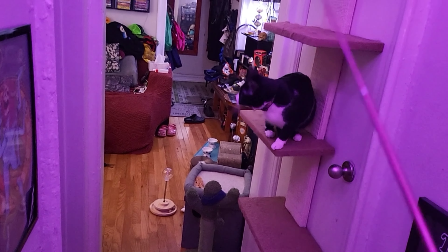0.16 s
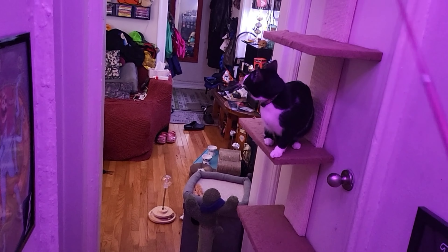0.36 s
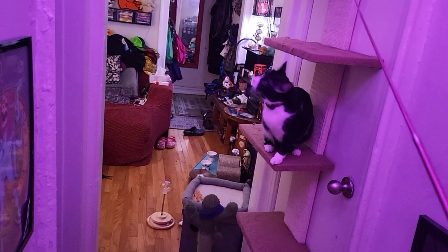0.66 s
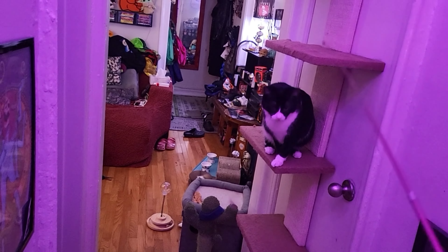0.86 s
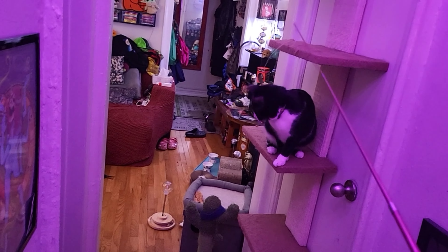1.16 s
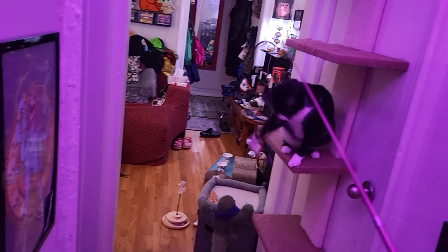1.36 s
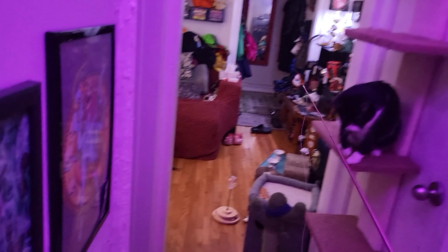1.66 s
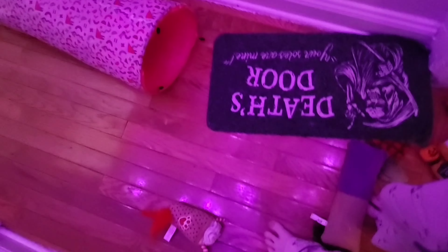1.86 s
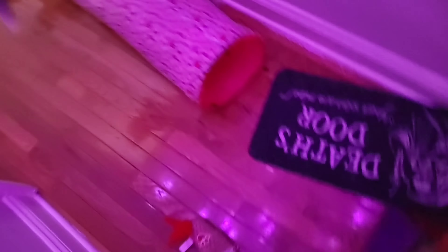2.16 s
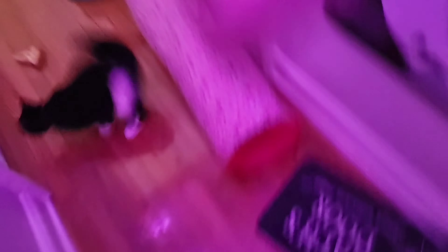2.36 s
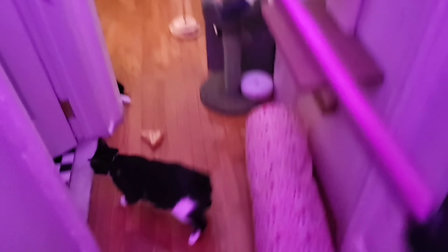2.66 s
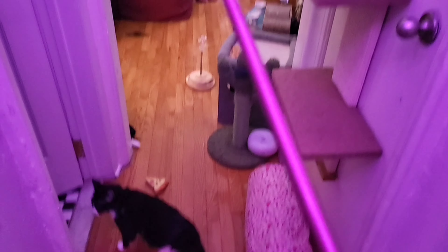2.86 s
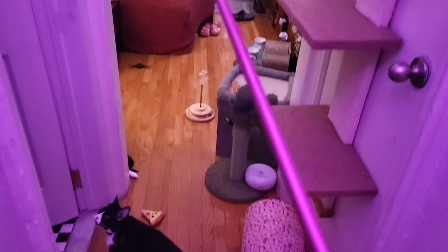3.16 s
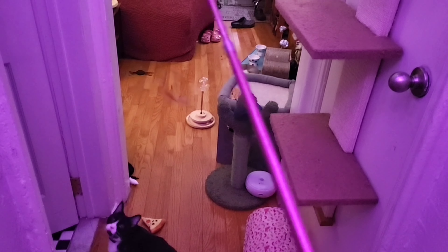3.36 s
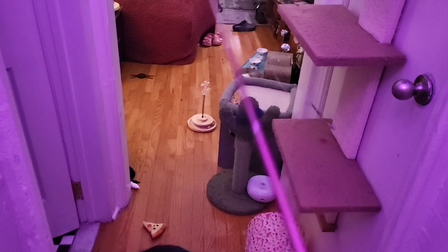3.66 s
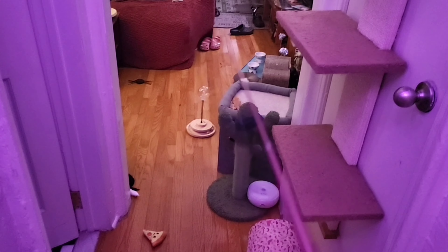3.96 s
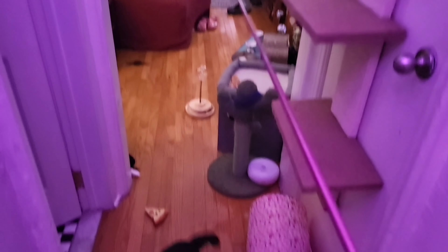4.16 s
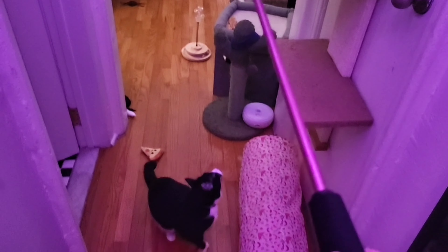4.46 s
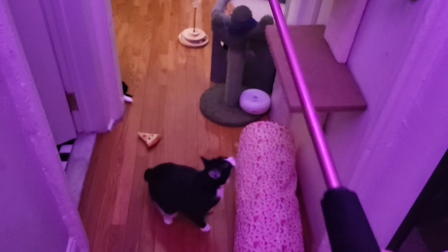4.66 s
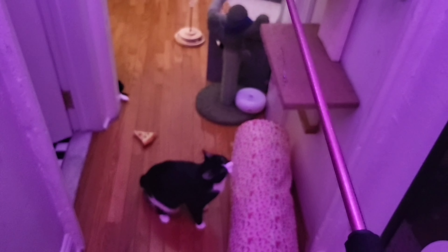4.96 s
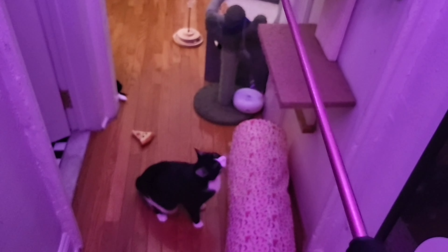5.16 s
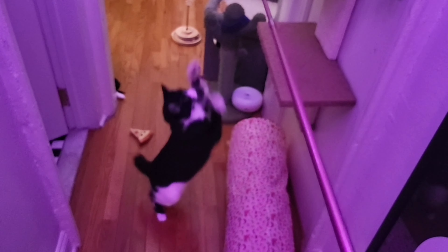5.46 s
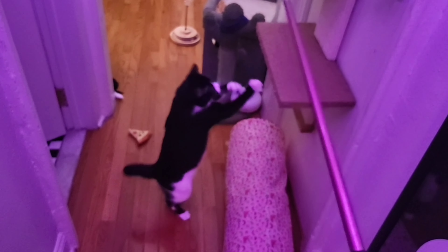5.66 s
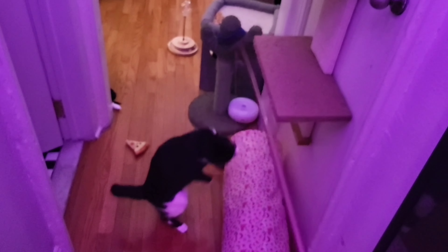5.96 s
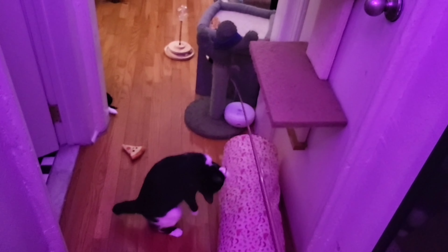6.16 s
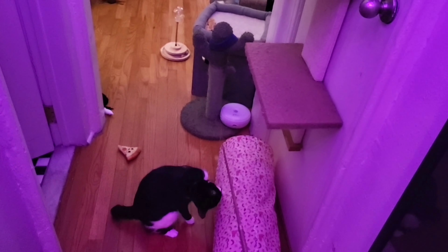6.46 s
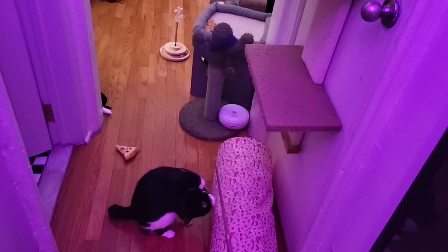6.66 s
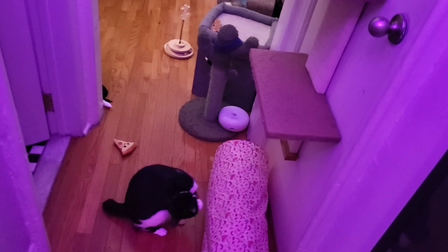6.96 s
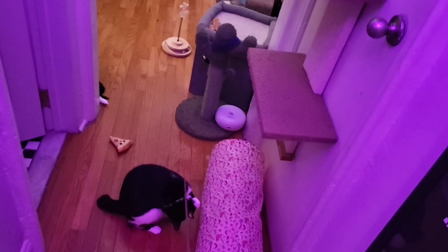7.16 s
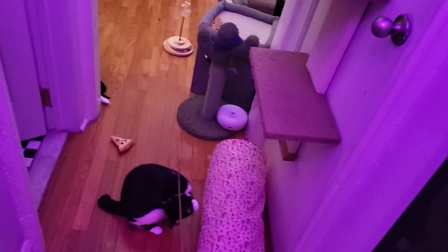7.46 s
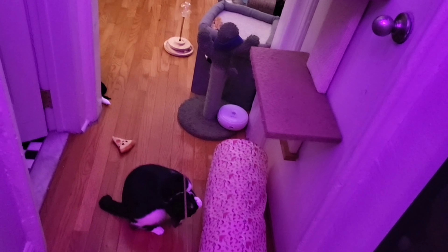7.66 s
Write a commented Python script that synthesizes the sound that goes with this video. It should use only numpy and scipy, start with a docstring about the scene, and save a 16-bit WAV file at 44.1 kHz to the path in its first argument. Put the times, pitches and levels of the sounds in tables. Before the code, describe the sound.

A handheld stereo microphone hears a cat toy up close indoors. Its small, very high-pitched bell rattles and tinkles on and off while the rod ticks. Two quick smacks against wood come first, then a low double thump and knocks as a cat lands on floorboards. After sparser jingling and one lively burst, it grows quiet with faint cloth slides, and a finger taps the right microphone port. Faint air and low hum persist.

```python
"""A tiny bell on the string of a wand toy jingles in bursts as cats play in a hallway with a wooden floor.
Inside it a loose pellet strikes, rebounds and rolls, ringing the shell through fading sine waves.
The toy smacks the woodwork twice, the rod ticks, wood knocks and a cat jumps down with a dull thump:
these mix coloured noise with ringing tones. Scuffs and string are grainy noise that follows movement.
Near the end a finger taps one microphone port; faint air noise and a low hum lie under it all."""
import sys
import numpy as np
from scipy import signal
from scipy.fft import rfft, irfft, next_fast_len
from scipy.io import wavfile
from scipy.ndimage import uniform_filter1d

SR = 44100
rng = np.random.default_rng(int(sys.argv[2]) if len(sys.argv) > 2 else 0)


def write(x):
    x = np.atleast_2d(x).T
    wavfile.write(sys.argv[1], SR, np.round(np.clip(x, -1, 1) * 32767).astype(np.int16))


N = 344421
TIME = np.arange(N) / SR
AGE = TIME[:SR]   # the first second after a blow

# tone colour of something sliding over cloth, also used for the faint hiss after the tap:
# (frequency [Hz], level [dB])
SLIDE_COLOUR = [(500, -10), (1800, -6.5), (3000, -7), (5000, -3), (6500, -2.5), (9000, -7.5), (15000, -13)]
PANEL_RIPPLE_DB = 6   # unevenness that close resonances give to struck wood


def from_db(db):
    """Turn decibels into a gain."""
    return 10 ** (np.asarray(db) / 20)


def rms_one(x):
    """Scale a signal to an average (rms) strength of 1."""
    return x / np.sqrt(np.mean(x ** 2) + 1e-20)


def at_hz(points, hz):
    """Read a table between its points on a log-frequency axis."""
    f, value = np.transpose(points)
    return np.interp(np.log(hz), np.log(f), value)


def dying(t60):
    """Envelope that loses 60 dB in t60 seconds."""
    return np.exp(-np.log(1000) * AGE / t60)


def swelling(rise_s):
    """Envelope that builds up from nothing to 1."""
    return 1 - np.exp(-AGE / max(rise_s, 1e-5))


def panned(db):
    """Left and right gains; a positive level difference favours the left."""
    return from_db([[db / 2], [-db / 2]])


def add(out, s, sound):
    """Mix a sound in at time s."""
    i = max(round(s * SR), 0)
    out[..., i:i + sound.shape[-1]] += sound[..., :N - i]


def mode(hz, t60, phase=0):
    """One way a struck object vibrates: a sine wave whose envelope starts at 1 and dies away."""
    return np.sin(2 * np.pi * hz * AGE + phase) * dying(t60)


def noise(colour, tilt_db=0, size=SR, ripple_db=0):
    """Stereo noise of a given colour, rippled by close resonances; its left-right likeness varies with pitch."""
    # how alike the two ports hear a sound: (frequency [Hz], left-right correlation [-1 to 1])
    likeness = [(30, 0.94), (130, 0.14), (260, 0.92), (500, -0.45), (1100, -0.22), (2200, -0.23),
                (15000, 0.11)]
    hz = np.arange(size // 2 + 1) * SR / size + 1e-3
    mid, side = rfft(rng.standard_normal((2, size)))
    alike = np.clip(at_hz(likeness, hz), -1, 1)
    ripple = np.interp(np.sqrt(hz / hz[-1]), np.linspace(0, 1, 300), rng.uniform(-1, 1, 300))
    tilt = tilt_db * np.log2(np.maximum(hz, colour[0][0]))
    gain = from_db(at_hz(colour, hz) + tilt + ripple_db * ripple) * (hz > 20)
    # the shared part has the same sign on both sides, the other part opposite signs
    both = np.sqrt(1 + alike) * mid + np.sqrt(1 - alike) * side * [[1], [-1]]
    return rms_one(irfft(gain * both, size))


def hallway(t60, wet_db):
    """Direct sound, then a dense wash of reflections with wet_db of energy."""
    wash = rng.standard_normal((2, SR)) * dying(t60) * swelling(0.0054)
    response = from_db(wet_db) * wash / np.sqrt(np.sum(wash ** 2) / 2)
    response[0, 1] += 1   # the direct sound reaches the right port one sample earlier
    response[1, 0] += 1
    return response


def wavering(depth_db, rate_hz):
    """Level flutter as reflections mix, different at each port; it holds still after 200 steps."""
    knots = rng.normal(0, depth_db, (2, 200))
    return from_db([np.interp(AGE * rate_hz, np.arange(len(k)), k) for k in knots])


def stroke(s, db, rise_s, fall_s):
    """Gain of one rubbing movement that swells up to time s and fades."""
    depth_db = 30   # level change over one rise or fall time
    away = np.maximum((s - TIME) / rise_s, (TIME - s) / fall_s)
    return from_db(db - depth_db * np.minimum(away, 10))


def lingering(blows, envelope):
    """Gain that follows each blow, its power shaped by the envelope."""
    return np.sqrt(np.abs(signal.oaconvolve(blows ** 2, envelope)[:N]))


def swinging(fade_db_per_s=19, rise_s=0.0082, stop_t60=.17, dangle_db=-80.5):
    """How lively the bell is: each swing starts quickly, fades slowly and settles."""
    # the bell swings on its string and the pellet keeps tumbling:
    # (time [s], length [s], relative level [dB])
    swings = [(0.412, 0.19, -42), (0.88, 0.23, -65), (1.313, 0.51, -65), (1.719, 0.19, -65),
              (1.957, 0.092, -49), (2.196, 0.17, -55.5), (2.388, 0.19, -47), (3.17, 0.26, -55),
              (3.61, 0.33, -71), (3.877, 0.15, -57.5), (4.443, 0.36, -64.5), (4.743, 0.35, -53.5),
              (5.168, .3, -66), (5.51, 0.15, -41), (5.732, 0.16, -60.5), (6.675, 0.1, -62),
              (7.11, 0.14, -68), (7.53, .19, -62)]
    out = np.full(N, from_db(dangle_db))   # the string never hangs quite still
    for s, length_s, db in swings:
        settling_db = 60 * np.maximum(AGE - length_s, 0) / stop_t60
        add(out, s, from_db(db - fade_db_per_s * AGE - settling_db) * swelling(rise_s))
    return out


def pellet_blows(swing, jolt_db=4, rebound_db=-10, rebound_s=0.0065):
    """Hard jolts and the lighter, uneven tumbling of a swinging bell; each blow rebounds twice."""
    # hard jolts that throw the pellet against the shell: (time [s], relative level [dB])
    jolt_table = [(0.3461, -14.5), (0.6596, -20.5), (0.6854, -17), (0.6878, -14.5), (0.7363, -26.5),
                  (0.7567, -27.5), (0.938, -42.5), (1.449, -50), (1.8218, -47), (1.8926, -49),
                  (1.9694, -28.5), (2.0593, -28.5), (2.0943, -29), (2.4226, -33), (2.7457, -43.5),
                  (3.0742, -42.5), (3.1418, -38), (3.1953, -32), (3.2475, -36.5), (3.3054, -44),
                  (3.3363, -44), (4.5146, -48), (4.732, -27.5), (4.7504, -21), (4.8384, -33),
                  (4.935, -35.5), (5.014, -41), (5.1794, -42.5), (5.222, -45), (5.2855, -45.5),
                  (5.3368, -51), (5.525, -18), (5.5494, -17), (5.5753, -22.5), (5.6613, -21), (5.7528, -39),
                  (5.8114, -39.5), (5.8875, -49.5), (6.77, -48.5)]
    tumble_s, tumble_db, spread_db = .05, 13, 5.5   # average spacing, height above the swing, scatter
    skid_s, skid_db = 0.0052, -17   # the pellet grazes the shell just ahead of a hard jolt
    tumbles = np.cumsum(rng.uniform(.5, 1.5, size=240)) * tumble_s
    scatter_db = spread_db * rng.standard_normal(len(tumbles))
    light = np.interp(tumbles, TIME, swing, right=0) * from_db(tumble_db + scatter_db)
    jolts, db = np.transpose(jolt_table)
    hard = from_db(db + jolt_db)
    s = np.r_[tumbles, jolts - skid_s, jolts]
    strength = np.r_[light, hard * from_db(skid_db), hard]
    # every blow is followed by two rebounds, each weaker than the one before
    flights = rng.uniform(.3, 2, (len(s), 2)) * rebound_s
    when = s[:, None] + np.cumsum(np.c_[np.zeros(len(s)), flights], axis=1)
    at = np.clip(np.round(when * SR).astype(int), 0, N - 1)
    blows = np.zeros(N)
    blows[at] = strength[:, None] * from_db(rebound_db * np.arange(at.shape[1]))
    return blows


def bell(blows, swing, strike_db=-8, chatter_db=-8, scrape_db=-14, rolls_per_s=160, uneven_db=6.5,
         chatter_s=.005, low_hz=9300):
    """A loose pellet strikes the slit shell, chatters and rolls; every touch sets the shell's modes ringing."""
    # how the bell's shell rings: (frequency [Hz], level [dB], time to fade 60 dB [s])
    shell_modes = [(7000, -30, .002), (10350, -14, .006), (11250, -14, .008), (11690, -3, .02),
                   (11830, -2, .022), (11940, -1, .026), (12250, -16, .015), (12800, -20, .01),
                   (15300, -29, .004)]
    swing_roll_db, roll_db = -6.5, -3   # rolling relative to the swing, and to each blow
    roll_rise_s, roll_t60 = 0.0089, .1
    rings = [from_db(level) * mode(hz, t60) for hz, level, t60 in shell_modes]
    shell = from_db(strike_db) * signal.oaconvolve(blows, sum(rings) * swelling(.0014))[:N]
    # each blow brings a few milliseconds of chatter against the metal
    burst = dying(chatter_s) * swelling(.001)
    chatter = from_db(chatter_db) * lingering(blows, burst / burst.sum())
    # the pellet rolls while the bell swings and for a moment after each blow
    after_blow = lingering(blows, (dying(roll_t60) * swelling(roll_rise_s)) ** 2)
    roll = np.hypot(from_db(swing_roll_db) * swing, from_db(roll_db) * after_blow)
    touch_gain = from_db(uneven_db * np.clip(rng.standard_normal(N), -2, 2))
    touches = (rng.random(N) < rolls_per_s / SR) * touch_gain
    touches = rms_one(np.sqrt(np.abs(uniform_filter1d(touches ** 2, size=60))))
    rolling = touches * roll * from_db(-6) / np.sqrt(np.sum(np.square(rings)))
    # fresh noise for every mode, so each touch rings the modes differently
    for ring in rings:
        shell += signal.oaconvolve((chatter + rolling) * rng.standard_normal(N), ring)[:N]
    # the rolling pellet also scrapes, a broader hiss around the ring
    scrape_band = signal.butter(2, [9800, 13400], "band", fs=SR, output="sos")
    scrape = signal.sosfilt(scrape_band, rng.standard_normal(N))
    shell += from_db(scrape_db) * rms_one(scrape) * touches * roll
    # so small a shell radiates hardly any low sound
    bright = signal.sosfilt(signal.butter(8, low_hz, "high", fs=SR, output="sos"), shell)
    faint = signal.sosfilt(signal.butter(2, [3500, 7800], "band", fs=SR, output="sos"), shell)
    shell = bright + from_db(-4) * faint
    room = hallway(t60=.19, wet_db=-3)
    return signal.oaconvolve(shell[None], room, axes=1)[:, :N] * panned(-2.8)


def smacks(early_t60=0.14, late_t60=0.3, late_db=-18, crack_t60=.012):
    """Toy hits wood: a crack, a rattling wash off the near walls, a longer room tail and the toy's own ring."""
    # the toy smacks the woodwork: (time [s], wash level [dB], build-up [s], first crack [dB],
    # treble tilt [dB per octave], ring [dB])
    smack_table = [(0.3429, -15, 0.0051, -6.5, 1, -41), (0.4795, -4, .009, -24, 2, -26)]
    # tone colour of a smack: (frequency [Hz], level [dB])
    colour = [(100, -20), (300, -13.5), (700, -7), (1400, -3), (2500, 4), (3800, -2), (4700, -8.5),
              (6000, -2.5), (8600, -16), (10500, -10), (13000, -7), (15500, -11.5)]
    # what the struck toy and shelf ring with: (frequency [Hz], level [dB], time to fade 60 dB [s])
    toy_modes = [(388, -11, .5), (1340, -4, .24), (2030, -1, .19), (2460, 2, .22), (3003, 3, .26),
                 (3628, 6, .14), (3893, 9, .14), (4581, 1, .1), (5612, 3, .12), (5850, 3, .15),
                 (7032, -3, .2), (7361, 2, .18), (10910, -2, .16), (11620, 3, .1), (12640, 1, .11),
                 (14816, 2, .1), (15005, 6, .11), (15595, 6, .11)]
    out = np.zeros((2, N))
    for s, db, rise_s, crack_db, tilt_db, ring_db in smack_table:
        decay = dying(early_t60) + from_db(late_db) * dying(late_t60)
        wash = noise(colour, tilt_db, ripple_db=PANEL_RIPPLE_DB) * decay
        crack = noise(colour, tilt_db) * dying(crack_t60) * swelling(.0004)
        ring = 0
        for hz, level, t60 in toy_modes:
            tone = mode(hz, t60, rng.uniform(-np.pi / 3, np.pi / 3, (2, 1)))
            ring = ring + from_db(level) * tone * wavering(depth_db=4.0, rate_hz=70)
        body = from_db(db) * wash * wavering(depth_db=1.5, rate_hz=330) + from_db(ring_db) * ring
        add(out, s, (body * swelling(rise_s) + from_db(crack_db) * crack) * panned(0.76))
    return out


def ticks(knock_db=-6, snap_db=-6, snap_t60=.014, room_t60=.22):
    """Each tick of rod or string has its own pitch, some ring of the thin rod and an answer from the hallway."""
    # light ticks of rod and string: (time [s], relative level [dB], main pitch [Hz],
    # share of rod ring [dB], share of room [dB])
    tick_table = [(0.0204, -42, 3020, -11.5, -13.5), (0.6496, -36.5, 5700, -33, -13),
                  (0.672, -35.5, 1960, -31, -28), (0.9191, -49, 5200, -10.5, -17),
                  (1.483, -61.5, 2700, -6.5, -26), (2.095, -41, 2220, -27, -6.5),
                  (2.135, -37, 3440, -12.5, -18), (2.576, -50, 3230, -20, -17),
                  (2.8779, -40.5, 5000, -39, -20), (3.203, -44, 2367, -14, -12.5),
                  (3.7475, -50, 6500, -26.5, -15.5), (4.163, -44, 3970, -17.5, -18),
                  (4.9035, -40.5, 1667, -32.5, -13.5), (5.448, -45.5, 2580, -16, -12),
                  (5.567, -46, 2410, -26.5, -9.5), (6.3271, -34.5, 1380, -38.5, -27),
                  (6.761, -46, 3680, -36, -22)]
    # what the thin rod rings with: (frequency [Hz], level [dB], time to fade 60 dB [s])
    rod_modes = [(2180, -5, .04), (2420, -2, .09), (2573, 7, .12), (2700, 0, .1), (3587, -5, .08),
                 (4830, -3, .055), (5730, 3, .055)]
    # the rod passes from left to right as the microphone turns: (time [s], left-right difference [dB])
    rod_side = [(1.6, 5), (2.2, -4)]
    out = np.zeros((2, N))
    for s, db, main_hz, ring_db, room_db in tick_table:
        pan_db = np.interp(s, *np.transpose(rod_side))
        # loudest at the main pitch, falling away on both sides
        colour = [(main_hz / 8, -24), (main_hz / 2, -8), (main_hz, 0), (main_hz * 1.5, -6), (main_hz * 5, -26)]
        ring = 0
        for hz, level, t60 in rod_modes:
            tone = mode(hz, t60, rng.uniform(-np.pi, np.pi, (2, 1)))
            ring = ring + from_db(level) * tone * wavering(depth_db=7.0, rate_hz=110)
        decay = from_db(snap_db) * dying(snap_t60) + from_db(room_db) * dying(room_t60)
        snap = noise(colour, ripple_db=PANEL_RIPPLE_DB) * decay
        knock = from_db(knock_db) * mode(main_hz, 0.017) * swelling(0.0019)
        add(out, s, from_db(db) * (from_db(ring_db) * ring + snap + knock) * panned(pan_db))
    return out


def knocks(t60=0.14, tail_t60=0.3, tail_db=-12, tail_tilt_db=-2.5):
    """Hard contacts on wood: fading noise, each with a duller room tail."""
    # hard contacts on the boards: (time [s], level [dB], build-up [s], treble tilt [dB per octave])
    knock_table = [(0.492, -32, 0.00077, 1.5), (0.673, -49, .001, -5), (1.72, -45.5, 0.0047, -4),
                   (2.2083, -23, 0.00019, 0), (2.341, -12, 0.0021, -2), (2.411, -14, 0.0019, 0),
                   (2.7309, -23.5, 0.00033, 0.5), (5.67, -42.5, 0.0023, -3)]
    # tone colour of struck boards: (frequency [Hz], level [dB])
    colour = [(47, -38), (80, -5.5), (243, -9.5), (350, -14.5), (395, -1), (483, -4.5), (723, -7),
              (960, -16), (1500, -16.5), (2690, -25), (8010, -42.5), (10000, -50.5), (13000, -79),
              (22000, -120)]
    out = np.zeros((2, N))
    for s, db, rise_s, tilt_db in knock_table:
        near = noise(colour, tilt_db, ripple_db=PANEL_RIPPLE_DB) * dying(t60)
        tail = noise(colour, tilt_db + tail_tilt_db) * dying(tail_t60) * from_db(tail_db)
        add(out, s, from_db(db) * (near + tail) * swelling(rise_s))
    return out * panned(-1.3)


def thuds():
    """Each landing drives the floor's modes most strongly near one pitch; soft paws build up slowly."""
    # weight coming down on the floor: (time [s], drive [dB], pitch most strongly driven [Hz])
    landings = [(1.988, -12, 52.4), (2.051, -7.5, 68.5), (2.111, -13, 53), (2.344, 0, 88.55),
                (2.346, -2.5, 52), (2.416, -9, 199), (2.433, -5.5, 211.1), (2.577, -19.5, 125),
                (3.604, -44, 117), (3.94, -31.5, 82.4), (4.619, -21, 70), (5.297, -37, 77),
                (5.676, -29.5, 96)]
    # what the floorboards ring with: (frequency [Hz], level [dB], time to fade 60 dB [s])
    boards = [(52, 1, .15), (86, 0, .13), (102, -3, .13), (139, -1, .22), (158, -1, .15), (202, 2, .19),
              (260, -10, .15), (321, -1, .15), (400, -8, .1), (458, -7, .16), (506, -7, .12)]
    paw_hz, paw_contact_s, paw_octaves = 85, 0.0085, 0.52   # ordinary footfall: pitch, contact, spread
    contact_law, spread_law = 1.8, .7   # higher-pitched landings are shorter and broader by these powers
    out = np.zeros(N)
    pitches, levels, _ = np.transpose(boards)
    rings = np.array([mode(hz, t60) for hz, _, t60 in boards])
    for s, db, centre_hz in landings:
        hardness = centre_hz / paw_hz
        octaves = paw_octaves * hardness ** spread_law
        contact_s = paw_contact_s / hardness ** contact_law
        distance = np.log2(pitches / centre_hz) / octaves
        drive = from_db(db + levels) / (1 + distance ** 2) ** 2
        add(out, s, drive @ rings * swelling(contact_s))
    return out * panned(-0.53)


def brushing(movement, colour, grain_db):
    """Grainy friction noise that follows the movement."""
    grains = from_db(grain_db * rms_one(uniform_filter1d(rng.standard_normal(N), size=150)))
    return noise(colour, size=next_fast_len(N))[:, :N] * rms_one(grains) * movement * panned(-0.53)


def shelf_resonance(scuffing, shelf_db=-4.5):
    """The scuffed board sounds at its own resonances: noise through narrow filters."""
    # resonances that the scuffing excites: (frequency [Hz], width [Hz], level [dB])
    resonances = [(668, 20, -0.5), (1820, 36, -10.5), (2000, 33, -5.5), (2550, 66, -13)]
    rub = rng.standard_normal((2, N))
    tone = 0
    for hz, width, db in resonances:
        tone = tone + from_db(db) * rms_one(signal.lfilter(*signal.iirpeak(hz, hz / width, fs=SR), rub))
    return from_db(shelf_db) * rms_one(tone) * scuffing


def cat_scuffs():
    """Fur and paws rub the shelf and floor: friction noise plus the shelf's resonances."""
    # a cat leaves the shelf and runs off: (peak time [s], level [dB], rise [s], fall [s])
    scuffs = [(2.11, -43.5, 0.23, 0.29), (2.85, -61, 0.75, 0.45)]
    # tone colour of the scuffing: (frequency [Hz], level [dB])
    colour = [(200, 7.5), (700, -3), (1200, 2), (2200, -6.5), (4000, -11), (6200, -7), (8500, -15),
              (15000, -17)]
    scuffing = sum(stroke(*row) for row in scuffs)
    return brushing(scuffing, colour, grain_db=3) + shelf_resonance(scuffing)


def string_and_cloth(blows, rise_s=0.12, fall_s=.12, flutter_db=-43.5, flutter_t60=0.08):
    """The string slides over cloth, and each blow in the bell also shakes the toy's cloth."""
    # the string sliding over cloth: (peak time [s], level [dB])
    slides = [(1.33, -73.5), (1.91, -66), (5.97, -56.5), (6.31, -66), (6.42, -79.5), (6.78, -64),
              (6.95, -71.5), (7.32, -71.5)]
    sliding = sum(stroke(s, db, rise_s, fall_s) for s, db in slides)
    flutter = from_db(flutter_db) * lingering(blows, dying(flutter_t60) ** 2)
    return brushing(sliding + flutter, SLIDE_COLOUR, grain_db=0.5)


def finger_tap(tap_s=7.0300, thump_db=-6.5, start_hz=580, sag_s=0.0015, t60=0.091, press_s=0.000084,
               spike_db=3, case_db=-11, far_db=-14, far_hz=340, far_t60=0.0076, hiss_db=-42, hiss_t60=0.12):
    """Pressure at the right port spikes and sags in a falling thump; the left hears it via the case."""
    cycles = start_hz * sag_s * np.log1p(AGE / sag_s)   # the pitch falls quickly, then ever more slowly
    thump = np.cos(2 * np.pi * cycles) * dying(t60) * swelling(press_s)
    spike = mode(2600, .0009, np.pi / 2)
    case = mode(1210, 0.0052, np.pi / 2)   # the case rings briefly
    hiss = noise(SLIDE_COLOUR)[1] * dying(hiss_t60)   # a faint hiss fades after the tap
    right = from_db(thump_db) * thump + from_db(spike_db) * spike
    right = right + from_db(case_db) * case + from_db(hiss_db) * hiss
    left = from_db(far_db) * mode(far_hz, far_t60) - from_db(-14.0) * spike   # upside-down, fainter spike
    out = np.zeros((2, N))
    add(out, tap_s, np.array([left, right]))
    # soften the treble; the tiny offset avoids vanishingly small numbers
    return signal.sosfilt(signal.butter(4, 5800, fs=SR, output="sos"), out + 1e-18)


def still_room(air_db=-61, hum_db=-55, hum_hz=51, hum_width_hz=6, sway_db=3):
    """Faint air noise and the unsteady low drone of some appliance, made from narrowly filtered noise."""
    # tone colour of the still room: (frequency [Hz], level [dB])
    air = [(25, -22.5), (40, -11.5), (60, -6), (80, -15.5), (105, -9.5), (160, -29.5), (400, -24.5),
           (800, -32.5), (1500, -37), (3800, -45.5), (5800, -46.5), (9000, -56.5), (16000, -57)]
    start = rng.standard_normal(next_fast_len(N + SR))
    narrow = signal.lfilter(*signal.iirpeak(hum_hz, hum_hz / hum_width_hz, fs=SR), start)
    narrow = signal.lfilter(*signal.iirpeak(hum_hz, 2, fs=SR), narrow)
    narrow = signal.hilbert(narrow)[SR:SR + N]   # skip the filters' first second
    # keep the noise's wandering phase, and let its strength sway the level in decibels
    drone = np.cos(np.angle(narrow)) * from_db(sway_db * rms_one(np.abs(narrow)))
    air_noise = noise(air, size=next_fast_len(N))[:, :N]
    return from_db(air_db) * air_noise + from_db(hum_db) * rms_one(drone)


def scene():
    """Everything heard at the two ports."""
    swing = swinging()
    blows = pellet_blows(swing)
    toy = bell(blows, swing) + smacks() + ticks()
    wood = knocks() + thuds()
    friction = cat_scuffs() + string_and_cloth(blows)
    return toy + wood + friction + finger_tap() + still_room()


def record(dry):
    """Clip the highest peaks and cut the top above 15900 Hz."""
    top_cut = signal.ellip(10, .2, 80, 15900, fs=SR, output="sos")
    return signal.sosfilt(top_cut, np.clip(dry, -.9, .9))


dry = scene()
out = record(dry)
write(out)
```